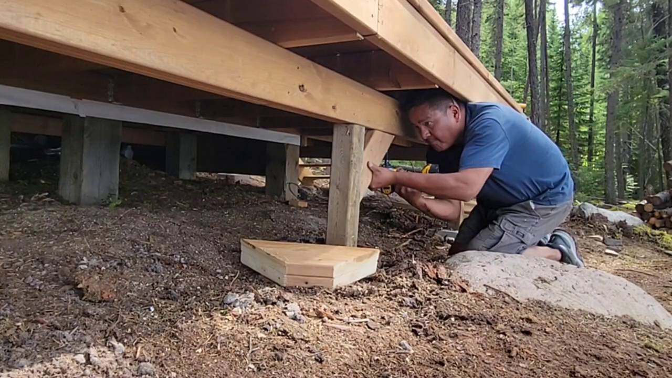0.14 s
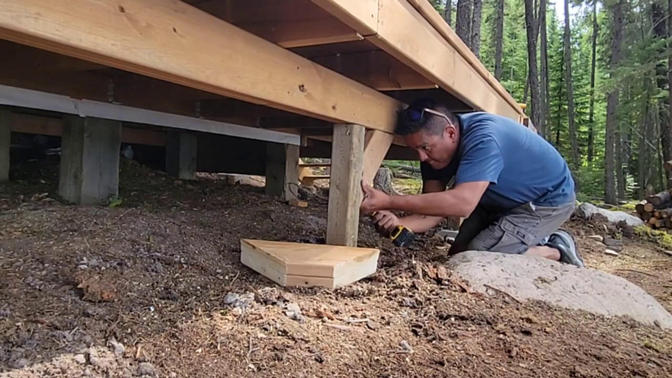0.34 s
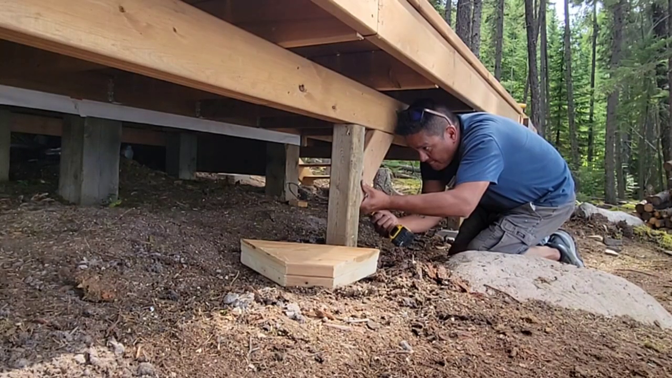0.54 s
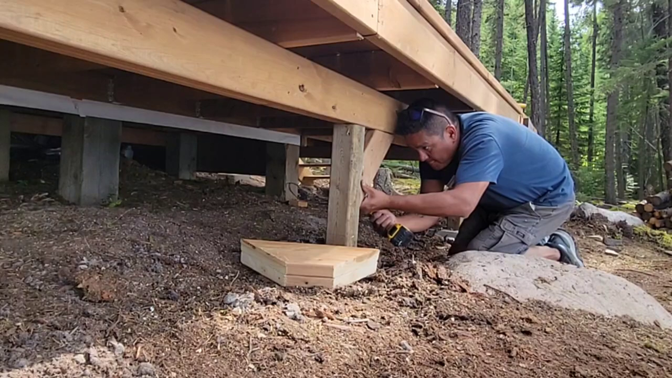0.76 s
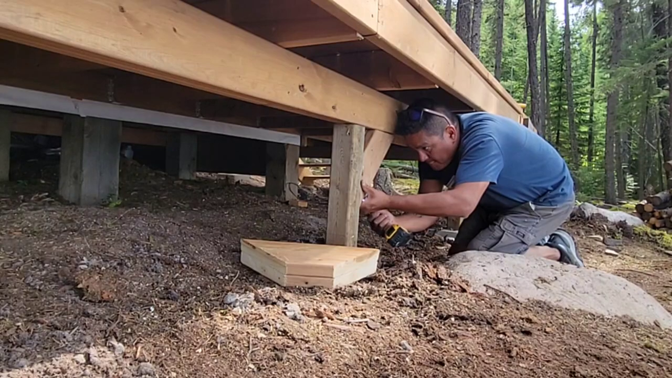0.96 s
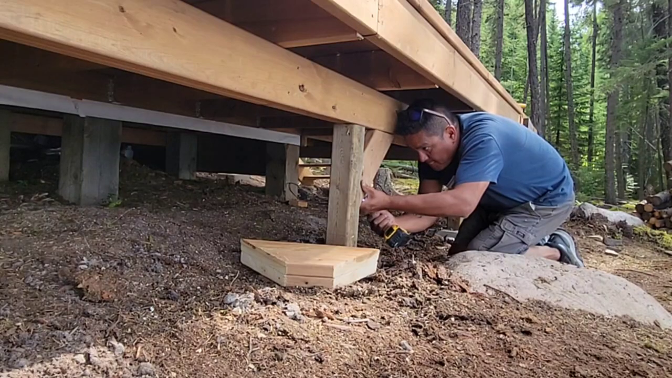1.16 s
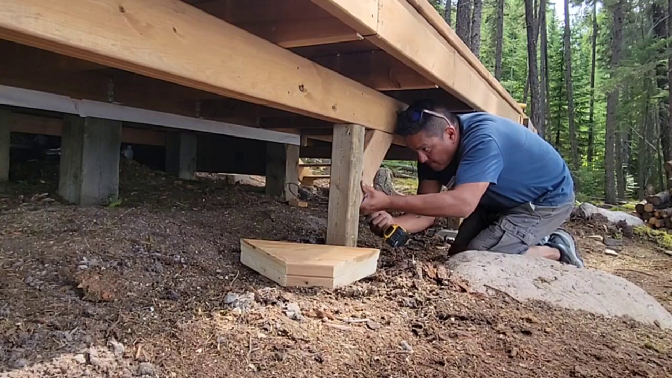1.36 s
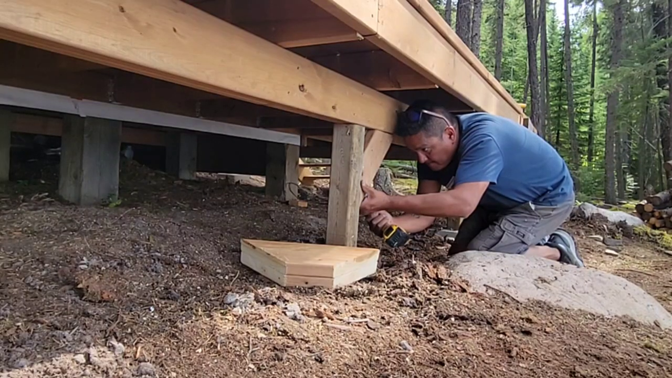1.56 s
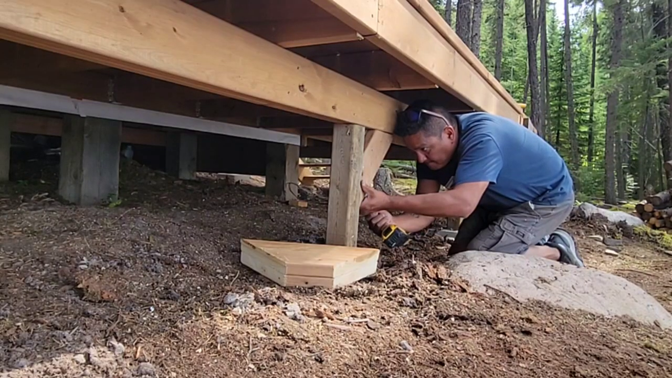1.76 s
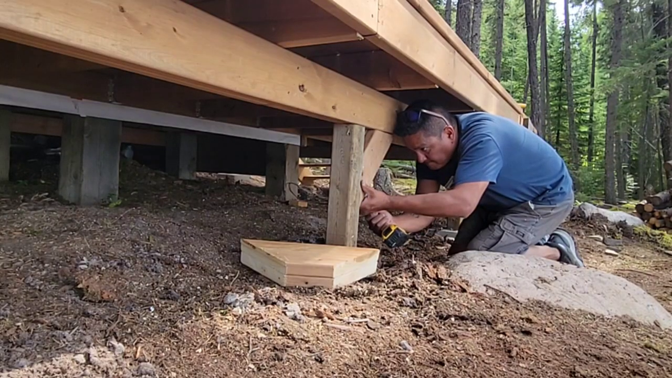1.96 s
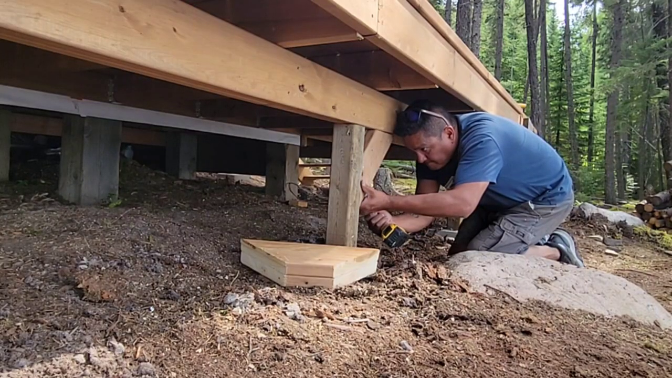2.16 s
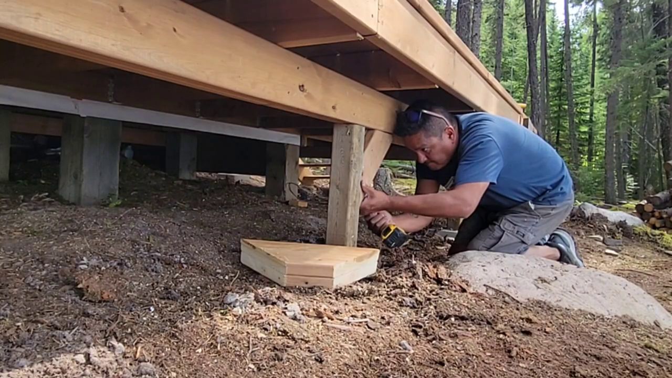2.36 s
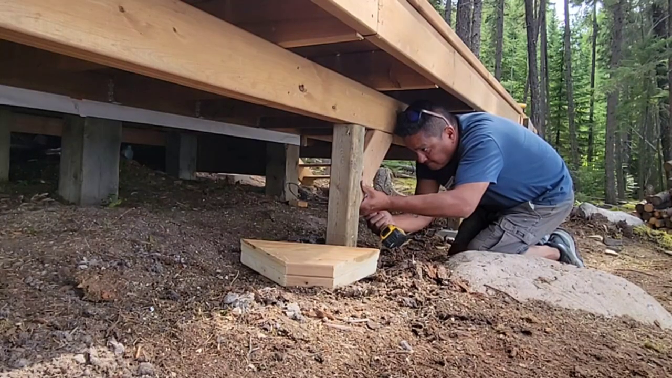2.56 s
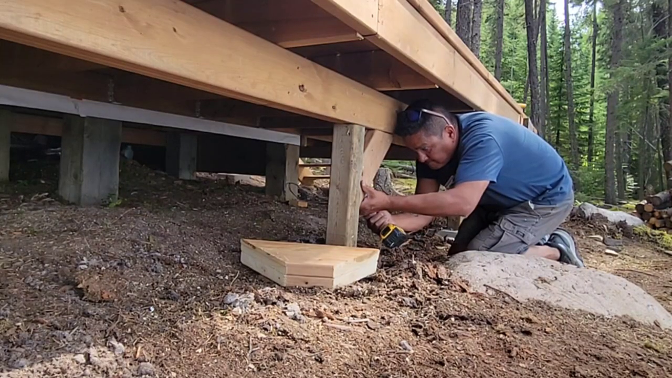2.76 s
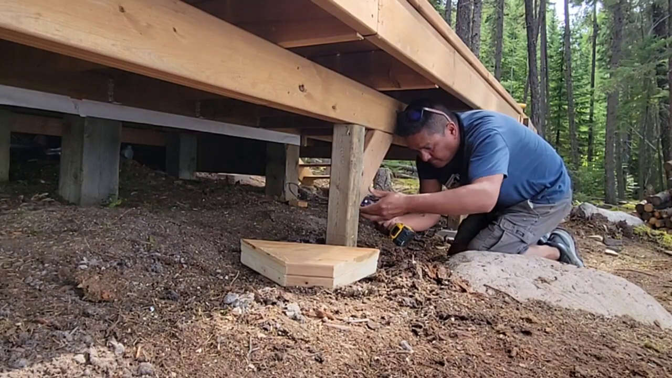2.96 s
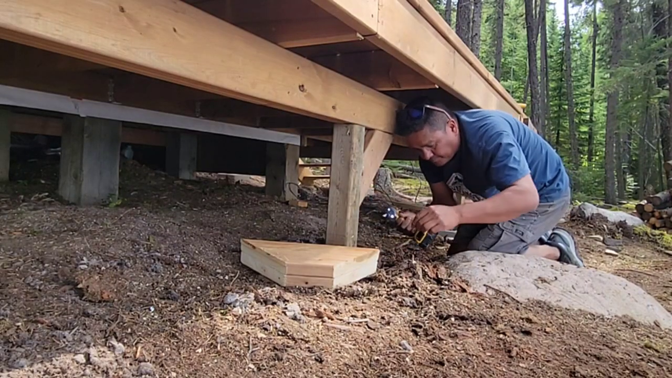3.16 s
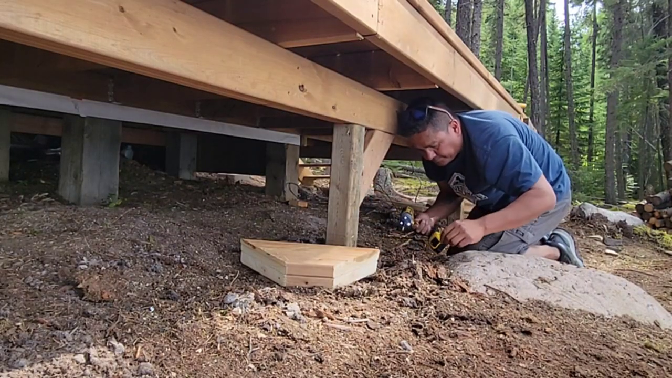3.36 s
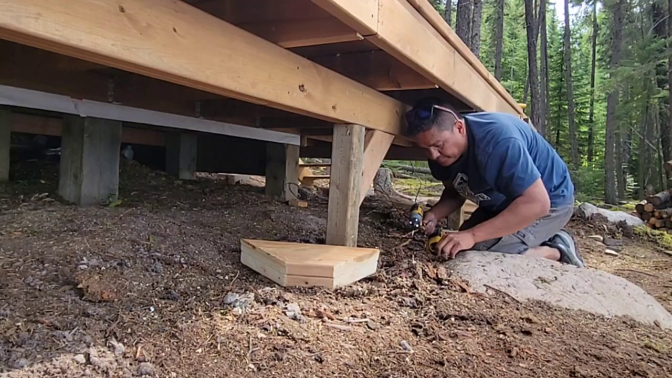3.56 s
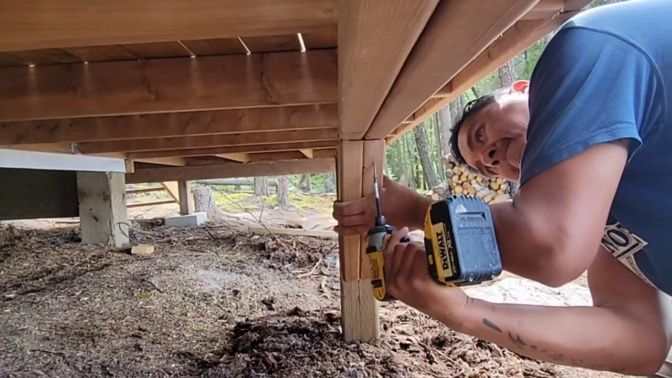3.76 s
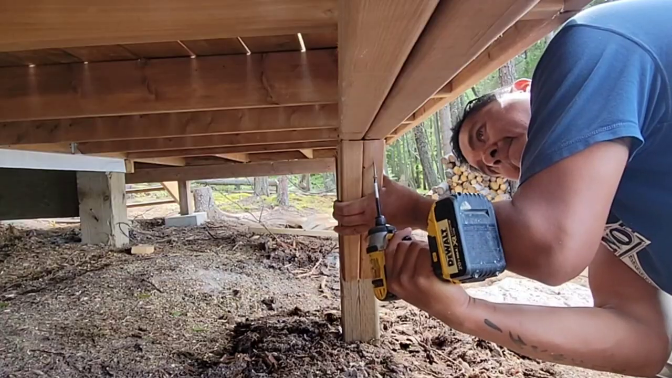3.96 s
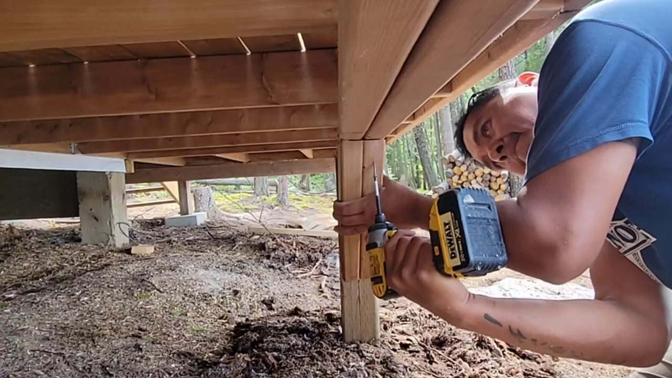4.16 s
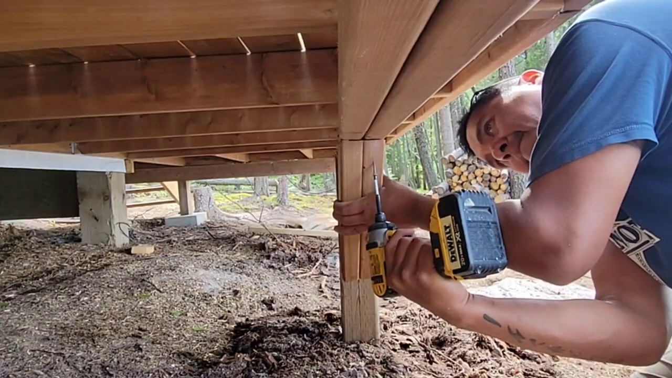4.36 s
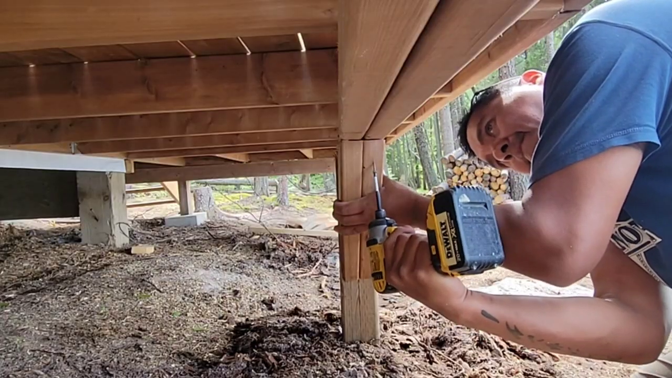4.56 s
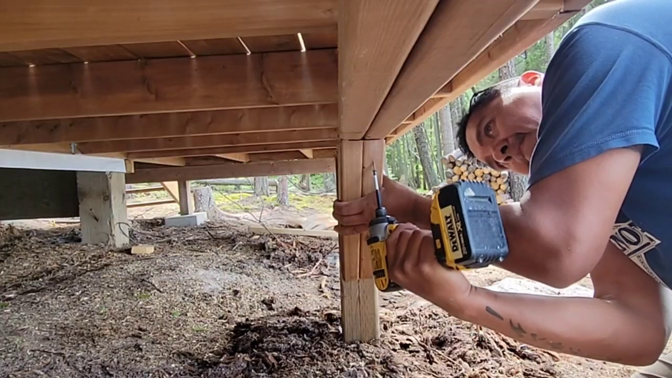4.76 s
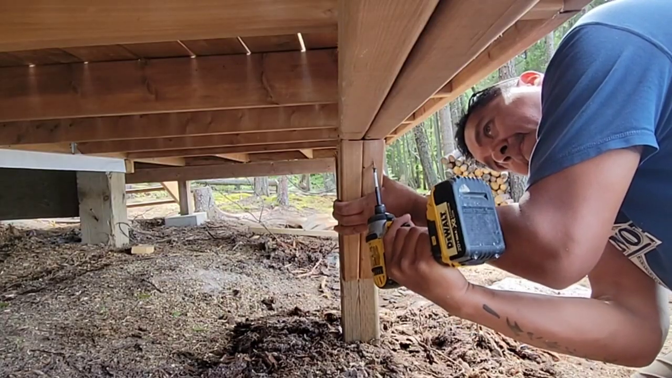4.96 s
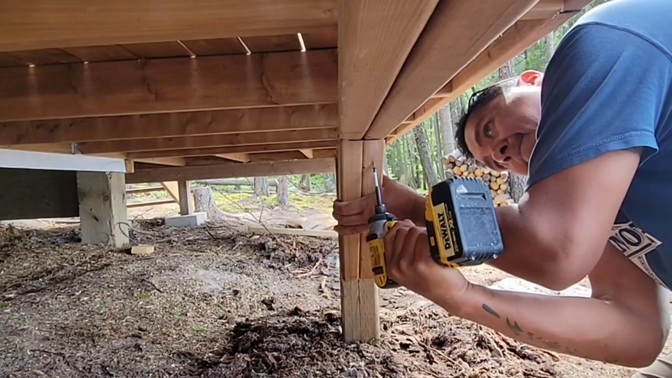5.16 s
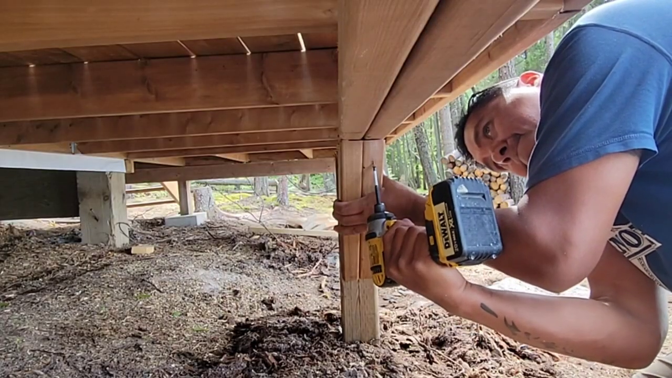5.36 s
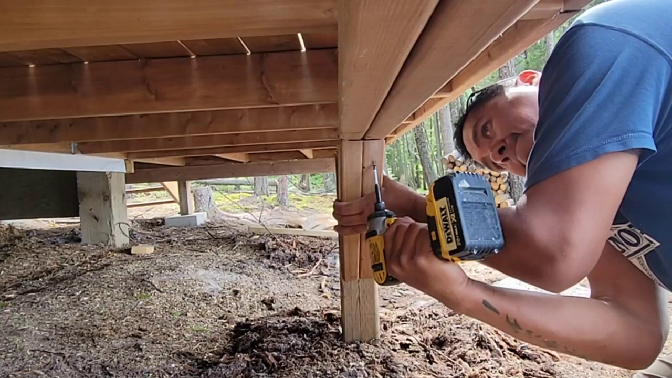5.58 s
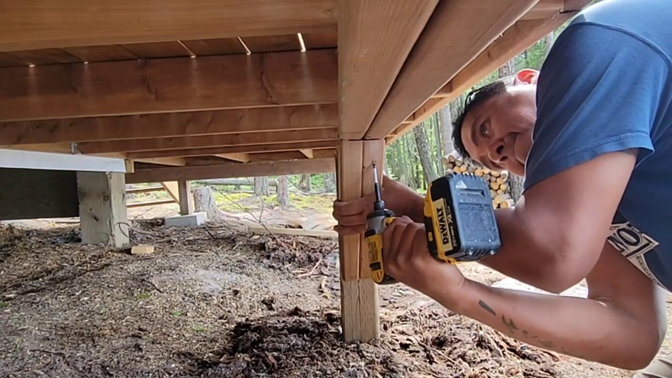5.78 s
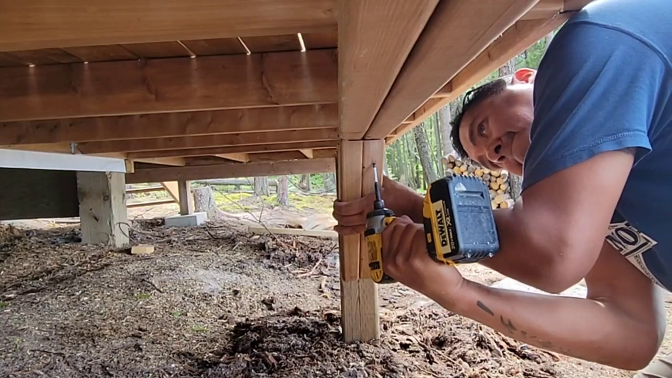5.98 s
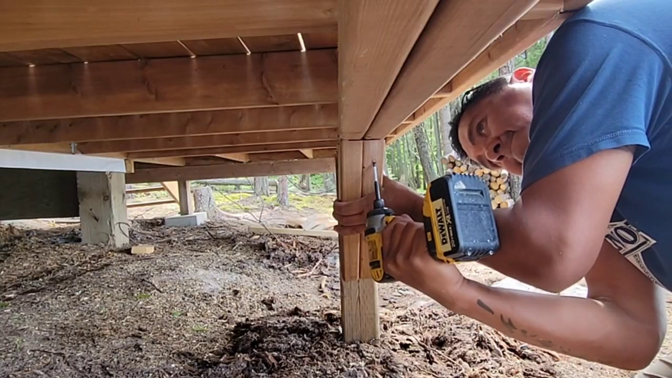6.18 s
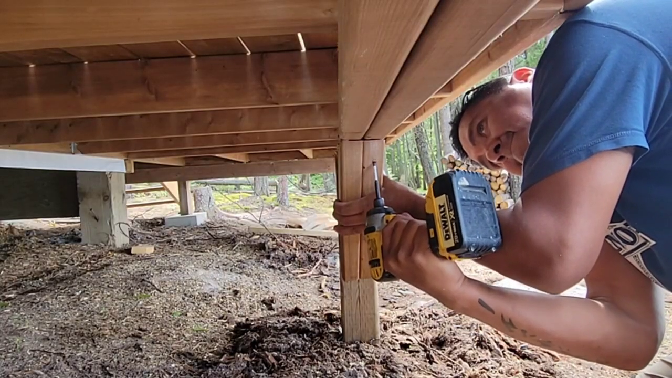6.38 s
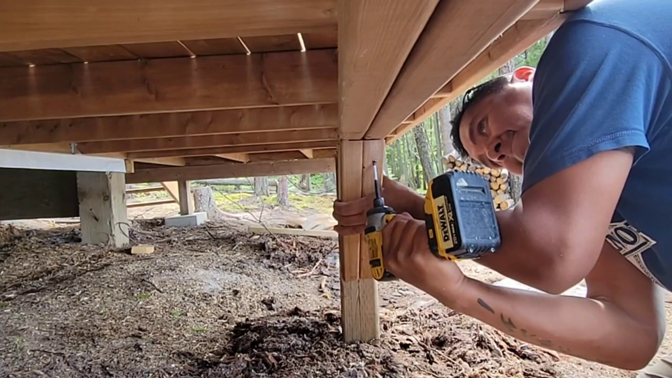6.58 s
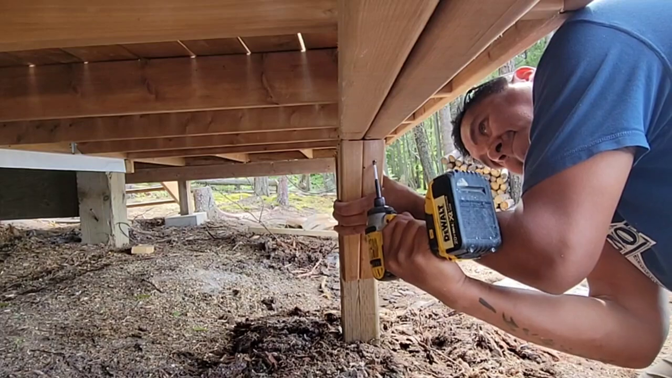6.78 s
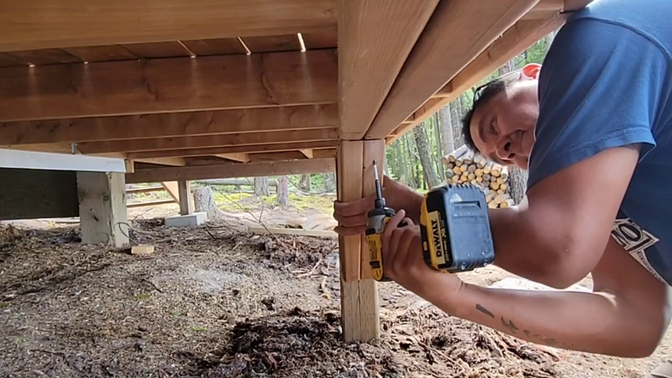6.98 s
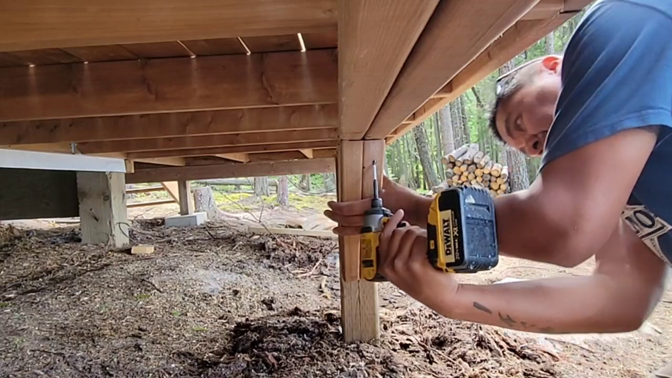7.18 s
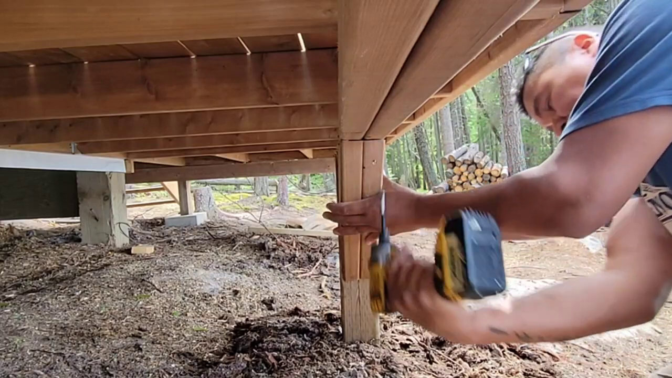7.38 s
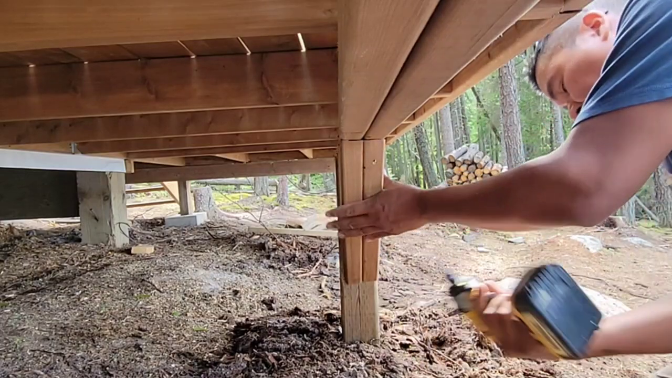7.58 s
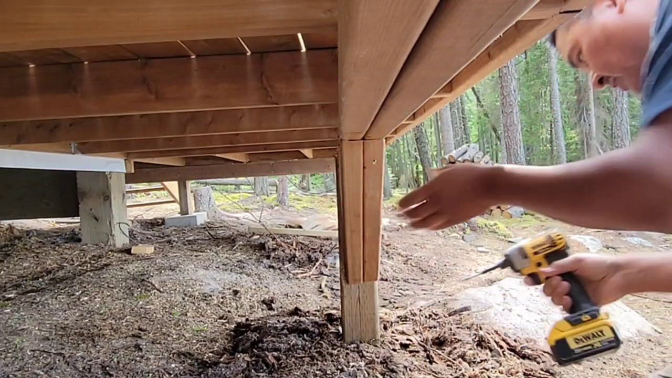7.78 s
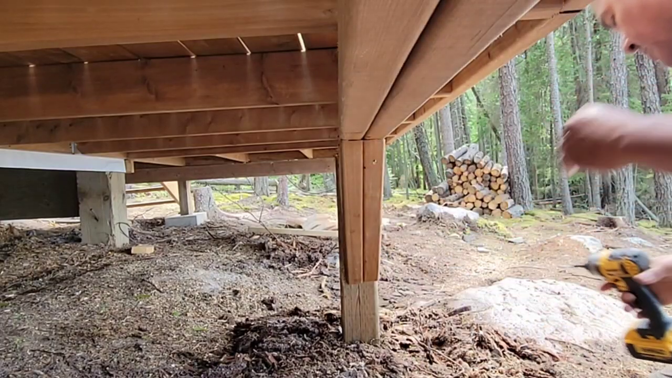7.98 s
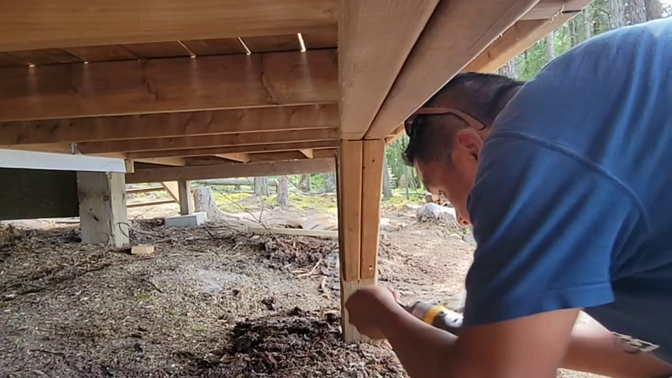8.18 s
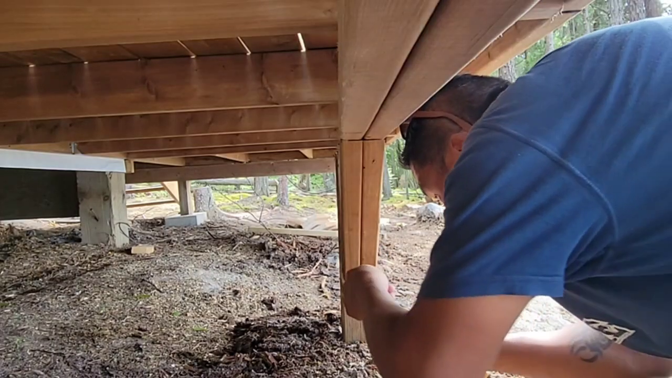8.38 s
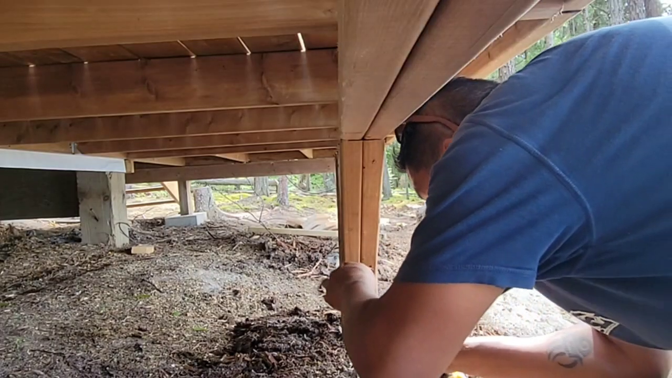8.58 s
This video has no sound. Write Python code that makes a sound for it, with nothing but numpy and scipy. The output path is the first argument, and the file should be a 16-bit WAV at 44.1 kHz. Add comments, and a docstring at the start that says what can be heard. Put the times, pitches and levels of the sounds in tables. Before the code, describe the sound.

Close stereo pickup of an impact driver on a resonant wooden post, with a short boxy echo from the deck. Blows, rising motor whine, piercing squeal, then about a second and a half of rapid hammering and a run-down. Knocks and stuttering trigger pulls lead to a second, slightly slower hammering run with metallic clatter. It ends quietly with small knocks, low generator drone and soft air rustle.

```python
"""A stereo pocket camera near an impact driver under a timber deck: a far generator fires through air and
rustle. A few opening blows ring with a timber of their own; the motor whines up, a thread squeals and the
hammer rings a braced post. At the second brace come knocks, bumps, scraping and short pulls, then the second
screw is hammered in. The motor runs down and small knocks end it. Blows ring modes; gear mesh and firing are
sine sums; rustle, scrape and clatter are filtered noise."""
import sys
import numpy as np
from scipy import signal
from scipy.fft import rfft, irfft, next_fast_len
from scipy.io import wavfile
from scipy.ndimage import uniform_filter1d

SR = 44100
rng = np.random.default_rng(int(sys.argv[2]) if len(sys.argv) > 2 else 0)


def convert_level_to_amplitude(level_db):
    """Map a level in decibels to its linear amplitude factor."""
    exponent = np.asarray(level_db, float) / 20
    return 10 ** exponent


def generate_wav(signal):
    """Clip the signal to [-1, 1] and save it as 16-bit WAV at the path in sys.argv[1]."""
    frames = np.transpose(np.atleast_2d(signal))
    scaled = np.clip(frames, -1, 1) * 32767
    pcm = np.round(scaled).astype(np.int16)
    wavfile.write(sys.argv[1], SR, pcm)


N = 380583
T = np.arange(N) / SR
# opening blows' timber ends; first brace drawn tight over this span; move to the second brace
OPENING_S, TIGHT_S, MOVED_S = 0.26, (2.12, 2.38), 3.69

# All levels are relative drives or gains, before the paths that follow.
# hammering, one table a screw: time_s, blows_per_s
STRIKE_RATE = [
    [(1.255, 41.23), (1.451, 38.33), (1.646, 39.45), (1.842, 38.98), (2.037, 38.58), (2.233, 40.65),
     (2.429, 41.3), (2.624, 41.37), (2.82, 40.42)],
    [(5.15, 28.11), (5.342, 35.05), (5.534, 33.92), (5.727, 34.66), (5.919, 36.05), (6.111, 36.17),
     (6.303, 36.68), (6.496, 37.06), (6.688, 37.02), (6.88, 38.25)],
]
# hammer cycle already done at the start of each table: share_of_cycle
STRIKE_START = [.59, .57]
# hammering, per screw: timber_db, steel_re_timber_db, loaded_gears_db, fade_s, gear_coast_s
RUNS = [(-12.5, -17.5, -23.5, 0.018, 0.1226), (-13.5, -15.5, -33, 0.073, .05)]
# steel level change up to the fade, per screw: gain_db
STEEL_GAINS_DB = [4.5, -2]
FADE_DB, COAST_DB = -12, -39.5  # last blow and end of coast, against the run
# lugs on their ramp ahead of a blow, per screw: early_share_of_cycle, level_db, pitch_hz
TICK = [(0.242, 8.5, 5410), (0.278, -4, 5435)]
# lone hammer blows: time_s, timber_db, steel_re_timber_db
BLOWS = [(0.03, -9.5, -21.5), (0.061, -16.5, -10), (0.074, -14, -15.5), (0.094, -29.5, 0),
         (0.102, -25, -7.5), (0.134, -31, -18), (1.124, -26, -19.5), (1.138, -11, -16.5), (4.131, -21, -7),
         (4.154, -25.5, -21.5), (4.775, -16, -16.5), (4.87, -8.5, -17), (4.89, -17.5, -21.5),
         (4.919, -15.5, -15), (4.93, -23.5, -27), (5.154, -13, -24), (5.173, -16, -25)]
# timber modes of the opening blows, loose first brace, tight first brace, second brace: pitch_hz, width_hz,
# gain_db
TIMBER = [
    [(75.1, 44, -5), (125, 25, -1.5), (266.5, 52, -1.5), (420, 29, -12), (620, 260, -13), (770, 68, -10),
     (950, 78, -15.5), (1200, 69, -22.5), (1380, 240, -34)],
    [(145.5, 22, -4.5), (250, 36, -7.5), (299, 61, -14.5), (400, 17, -7.5), (473.5, 31, -15.5),
     (550, 58, -13.5), (669, 27, -16), (831, 37, -9.5), (971, 10, -1), (1135, 44, -4), (1263, 60, -15),
     (1471, 56, -9.5), (1586, 41, -7.5), (1626, 130, -11.5), (1900, 100, -38)],
    [(88.4, 50, -11), (204.8, 19, 0), (387.7, 36, -8), (537.4, 40, -12), (549.3, 13, -3.5), (708, 21, -6),
     (842, 34, -14), (865, 60, -9.5), (889.4, 53, -6), (1170, 43, -8), (1430, 34, -8), (1650, 300, -12.5),
     (1766, 200, -19)],
    [(67, 34, -13), (112, 26, -6), (147.4, 15, -16), (250, 51, -7), (303, 46, -14), (339.8, 14, -11),
     (417.6, 37, -10.5), (460.3, 45, -15.5), (524, 51.6, -14), (569, 30, -15.5), (730, 77, -21.5),
     (982, 205, -23), (1072, 121, -18), (1460, 61, -24.5), (2025, 41, -33.5)],
]
# clatter of housing and bit, per screw: freq_hz, gain_db
CLATTER = [
    [(880, -29), (1500, -7.5), (2250, -17), (3350, -9.5), (4420, -19), (5540, -15.5), (6180, -16),
     (7320, -14), (9370, -17.5), (13300, -13.5), (16000, -25.5)],
    [(880, -31.5), (1500, -5.5), (1610, -9.5), (3350, 0), (4040, -10), (5540, -6.5), (6760, -9),
     (7390, -4.5), (8920, -12.5), (13100, -8.5), (16000, -16)],
]
# ring of anvil and bit: pitch_hz, width_hz, gain_db
STEEL = [(3280, 83, -10), (5430, 44, -8.5), (7120, 320, -5.5), (12600, 170, -5)]

# motor imbalance heard through the screw, per screw: level_re_timber_db
SHAFT_DB = [-21.5, 0.5]
TURNS_PER_BLOW = 7

# free running, one table a pull or run-down: time_s, gear_mesh_hz
SPEED = [
    [(.27, 429.3), (.37, 660), (.445, 930), (.51, 1016), (.626, 1070), (.722, 1350), (.822, 1408),
     (.92, 1328), (.97, 1188), (1.07, 550)],
    [(1.09, 667.5), (1.138, 951), (1.18, 1113), (1.29, 1180)],
    [(2.79, 1092), (2.96, 447.4)],
    [(4.06, 426.2), (4.134, 865.5), (4.19, 770), (4.28, 429.6)],
    [(4.39, 420), (4.44, 676.4), (4.485, 938), (4.54, 1073), (4.585, 1075), (4.67, 440.4)],
    [(4.75, 431), (4.785, 647.7), (4.82, 843), (4.877, 936), (4.91, 886), (4.98, 382.3)],
    [(5.115, 451), (5.15, 701), (5.19, 852)],
    [(6.83, 896), (6.94, 400)],
]
# per pull, levels for a 1 kHz mesh: swell_s, gear_noise_db, mesh_db, second_harmonic_db
PULLS = [(0.1, -43.5, -33.5, -40), (0.03, -38, -32.5, -39), (0.01, -38.5, -37, -56.5),
         (0.066, -31.5, -32, -25.5), (0.019, -31.5, -31.5, -28), (0.019, -31, -43, -23),
         (0.016, -30, -26.5, -40), (0.01, -48, -43, -47)]
# louder with speed; each pull swells from and brakes to the edge
DB_PER_OCTAVE, EDGE_DB, BRAKE_S = 5.5, -23.5, 0.049
HOUSING_HZ, HOUSING_WIDTH_HZ, HOUSING_DB = 1090, 105, 4
BRAKING_DB = -3
# gear noise spectrum: freq_hz, gain_db
GEARS = [(47, -31.5), (80, -0.5), (163, -19), (242, -3), (643, -10.5), (1020, -3.5), (1280, -7),
         (2080, -8.5), (2330, -8.5), (3470, -7), (4620, -10.5), (13400, -25), (16000, -30)]
# speed control pipes, trigger barely pulled: start_s, release_s
TRIGGER = [(4.063, 4.109), (4.392, 4.415), (4.759, 4.773)]
TRIGGER_HZ, TRIGGER_DB = 3920, -51.5

# thread slipping in the wood: time_s, pitch_hz, level_db
SQUEAL = [(0.565, 4460, -47.5), (0.601, 3940, -28), (0.625, 3910, -21), (0.651, 3740, -23.5),
          (0.705, 3920, -20.5), (0.791, 3770, -20), (0.859, 3196, -26), (0.933, 3507, -16.5),
          (0.981, 3190, -24.5), (0.991, 3140, -23), (1.001, 2270, -26.5), (1.04, 1260, -41)]
# squeal harmonics from the fundamental up: level_db
SQUEAL_HARMONICS_DB = [-1.5, -21, -30, -36]

# soft bumps of hand, tool and knee on the post: time_s, level_db, favoured_hz, falloff_db_per_octave
BUMPS = [(.002, -16, 260, 27.5), (0.158, -19, 243, 30), (3.706, -17, 241, 11), (3.775, -31, 322, 24),
         (3.918, -38, 359, 19), (4.115, -7, 250, 2.5), (4.701, -11.5, 250, 25), (7.296, -35.5, 250, 15.5),
         (7.609, -48, 325, 25), (7.681, -45, 230, 25)]
# low modes of the post: pitch_hz, t60_s
POST = [(100, 0.12), (150, 0.05), (258, 0.089), (370, .05), (470, 0.053)]
# small knocks of tool, screws and knees: time_s, peak_db, centre_hz
KNOCKS = [(0.2045, -42, 2940), (0.2718, -44, 980), (3.704, -24, 1010), (3.7778, -35, 2750),
          (3.9164, -55.5, 890), (3.9355, -44, 1090), (4.2956, -28.5, 1450), (4.4154, -17, 2700),
          (4.6836, -25.5, 1040), (4.703, -29.5, 1090), (5.053, -32, 1020), (5.115, -27, 3300),
          (5.1272, -13, 3230), (7.2976, -34, 1430), (7.3324, -43.5, 1150), (7.3687, -40.5, 1130),
          (7.3844, -50, 2670), (7.4872, -55, 1430), (8.0287, -43.5, 970), (8.091, -47.5, 2120),
          (8.1926, -54, 1060)]
KNOCK_T60_S, T60_FACTOR_PER_OCTAVE = .06, .7  # burst at 1 kHz; higher knocks die sooner
# bit and hands scraping on the wood: start_s, end_s, level_db
SCRAPE = [(3.69, 3.83, -53), (4.25, 4.333, -48.5), (4.648, 4.744, -47.5), (4.974, 5.09, -45),
          (7.276, 7.417, -61), (8.02, 8.26, -68)]
SCRAPE_EDGE_S, SCRAPE_EDGE_DB = 0.0332, -14.5

# background, steady from each time on: start_s, generator_db, air_db
GROUND = [(0, -47, -51.5), (3.69, -41, -52.5), (6.901, -47, -65.5), (7.25, -49.5, -59), (8.03, -46, -58)]
# generator harmonics before and after 3.69 s: harmonic_number, level_db
EXHAUST = [
    [(1, -11), (2, -12.5), (3, -16), (4, 1), (5, -3), (6, 1), (7, -4), (8, -20), (9, -17)],
    [(1, -10.5), (2, -2), (3, -0.5), (4, -0.5), (5, -10), (6, -12.5), (7, -6.5), (8, -15.5), (9, -17.5)],
]
FIRING_HZ = 31.33
# generator casing resonances: pitch_hz, width_hz, gain_db
CASING = [(500, 40, -3), (945, 40, 0), (1450, 50, -7), (2150, 60, -6), (2900, 80, -10)]
# air and rustle spectrum: freq_hz, gain_db
AIR = [(25, -10.5), (60, -6.5), (200, -13.5), (330, -24.5), (450, -30), (700, -38.5), (1500, -39.5),
       (3400, -39), (5000, -48), (8000, -48), (11000, -56.5), (16000, -59.5)]

DECK_T60_S, DECK_DB = .11, -5.5
# filter of the stereo difference: freq_hz, gain_db
WIDTH = [(60, -12.5), (110, -17.5), (200, -12.5), (380, -13.5), (700, -9), (1290, -7.5), (2380, -5),
         (4400, -1.5), (8120, -2), (15000, 0)]
TOP_HZ = 15900


def rms1(x):
    """Scale to unit rms."""
    return x / np.sqrt(np.mean(x ** 2) + 1e-30)


def noise():
    """White noise."""
    return rng.standard_normal(N)


def colour(x, points):
    """Causal minimum-phase filter with the given (Hz, dB) response."""
    hz, db = np.transpose(points)
    f = np.fft.rfftfreq(4096, 1 / SR)
    cepstrum = irfft(np.log(convert_level_to_amplitude(np.interp(np.log(f + 1), np.log(hz), db))))
    cepstrum[1:2048] *= 2
    cepstrum[2049:] = 0
    return signal.oaconvolve(x, irfft(np.exp(rfft(cepstrum))))[:N]


def ring(x, modes):
    """Damped modes of alternating sign; each dB is the gain at the centre."""
    out = 0
    for k, (hz, width_hz, db) in enumerate(modes):
        r = np.exp(-np.pi * abs(width_hz) / SR)
        zeros = [(1 - r * r) / 2, 0, (r * r - 1) / 2]
        poles = [1, -2 * r * np.cos(2 * np.pi * hz / SR), r * r]
        out = out + (-1) ** k * convert_level_to_amplitude(db) * signal.lfilter(zeros, poles, x)
    return out


def decay(x, t60_s):
    """Every pulse becomes an exponential tail."""
    return signal.lfilter([1], [1, -np.exp(-np.log(1000) / (t60_s * SR))], x)


def pulses(times_s, gains):
    """Clicks of the given gains at the given times."""
    x = np.zeros(N)
    np.add.at(x, np.clip(np.asarray(times_s) * SR, 0, N - 1).astype(int), gains)
    return x


def walk(rate_hz):
    """Random levels held 1 / rate_hz s and slewed twice; spread near 1."""
    k = int(SR / rate_hz)
    steps = np.repeat(rng.standard_normal(N // k + 1), k)
    return 1.4 * uniform_filter1d(uniform_filter1d(steps, k), k)[:N]


def curve(tables, column, off):
    """One column of several tables in time; `off` outside them."""
    out = np.full(N, float(off))
    for rows in tables:
        rows = np.array(rows)
        on = (T >= rows[0, 0]) & (T <= rows[-1, 0])
        out[on] = np.interp(T[on], rows[:, 0], rows[:, column])
    return out


def held(start, end, db, rise, fall, edge_db):
    """Rows (s, dB) of a level that rises from an edge, holds, and falls to the edge."""
    return [(start, db + edge_db), (start + rise, db),
            (max(end - fall, start + rise), db), (end, db + edge_db)]


def hammering():
    """Level curves in dB of timber, steel and loaded gears over both runs of blows."""
    timber, steel, gears = [], [], []
    for rate, run, gain_db in zip(STRIKE_RATE, RUNS, STEEL_GAINS_DB):
        db, steel_db, gears_db, fade_s, coast_s = run
        start, end = rate[0][0], rate[-1][0]
        steel_db = db + steel_db
        timber.append([(start, db), (end - fade_s, db), (end, db + FADE_DB)])
        steel.append([(start, steel_db), (end - fade_s, steel_db + gain_db), (end, steel_db - 4)])
        gears.append([(start, gears_db), (end - fade_s, gears_db),
                      (end + 0.62 * coast_s, gears_db - 7), (end + coast_s, gears_db + COAST_DB)])
    return [curve(v, column=1, off=-120) for v in (timber, steel, gears)]


def strikes():
    """Blow times, timber gains, steel gains, and lug tick times per run; hammer cycles plus lone blows."""
    lone_s, lone_timber_db, lone_steel_db = np.transpose(BLOWS)
    times, ticks = [], []
    for rows, start, tick in zip(STRIKE_RATE, STRIKE_START, TICK):
        on = T[(T >= rows[0][0]) & (T <= rows[-1][0])]
        cycles = start + np.cumsum(np.interp(on, *np.transpose(rows))) / SR
        whole = np.arange(1, int(cycles[-1]) + 1)
        times.append(np.interp(whole, cycles, on))
        ticks.append(np.interp(whole[1:] - tick[0], cycles, on))
    times = np.concatenate(times)
    chance = rng.standard_normal((3, len(times)))
    at = (times * SR).astype(int)
    run_db, run_steel_db, _ = hammering()
    all_s = np.r_[times + .0003 * chance[0], lone_s]
    timber = convert_level_to_amplitude(np.r_[run_db[at] + 1.1 * chance[1], lone_timber_db])
    steel = convert_level_to_amplitude(np.r_[run_steel_db[at] + 1.8 * chance[2], lone_timber_db + lone_steel_db])
    return all_s, timber, steel, ticks


def hammer():
    """Blows excite timber and steel modes; loose parts clatter, gears grind and lugs tick in filtered noise."""
    times, timber, steel, ticks = strikes()
    tight = np.interp(T, TIGHT_S, [0, 1])
    first = T < MOVED_S
    shares = (T < OPENING_S, first * (T > OPENING_S) * (1 - tight), first * tight, ~first)
    push = pulses(times, timber)
    # no two blows seat alike: a burst of noise drives the same modes, the upper ones more
    shake = convert_level_to_amplitude(-31) * colour(decay(push, 0.13) * noise(), [(100, -10.5), (600, -1.5), (1500, 4.5)])
    # the bit springs back and lands again, softer
    push = push + .55 * np.roll(push, int(.0064 * SR)) + .3 * np.roll(push, int(.0128 * SR))
    wood = 0
    drives_db, shakes_db = (46, 49.63, 49.05, 53.38), (9, -7.5, -0.5, 4.0)
    for share, modes, drive_db, shake_db in zip(shares, TIMBER, drives_db, shakes_db):
        wood = wood + convert_level_to_amplitude(drive_db) * ring((push + convert_level_to_amplitude(shake_db) * shake) * share, modes)
    hit = pulses(times, steel)
    # the lugs bounce for a few ms before the steel settles
    bounce = signal.oaconvolve(decay(hit, 0.015), np.hanning(300) / 100)[60:N + 60]
    crack = (bounce + convert_level_to_amplitude(-52.0) * decay(bounce, 0.073)) * convert_level_to_amplitude(2.6 * walk(1200)) * noise()
    _, steel_db, gears_db = hammering()
    running = convert_level_to_amplitude(steel_db)
    gears = colour(convert_level_to_amplitude(gears_db + 2.6 * walk(150)) * noise(), [(2000, -8), (5000, -13.0), (12000, -18.5)])
    out = wood + convert_level_to_amplitude(12.5) * ring(crack, STEEL)
    for spectrum, share, db, (_, tick_db, tick_hz), at in zip(CLATTER, (first, ~first), (25, 23), TICK, ticks):
        size = running[(at * SR).astype(int)] * convert_level_to_amplitude(tick_db + 1.7 * rng.standard_normal(len(at)))
        tick = uniform_filter1d(decay(pulses(at, size), 0.028), size=60) * noise()
        out += convert_level_to_amplitude(db) * colour(share * (crack + gears) + 0.15 * tick, spectrum)
        out += convert_level_to_amplitude(12.5) * ring(tick, [(tick_hz, 700, 0)])
    return out


def shaft():
    """Motor imbalance, locked to the hammer cycle by the gearing; weaker while the motor labours."""
    rate = curve(STRIKE_RATE, column=1, off=37)
    phase = 2 * np.pi * TURNS_PER_BLOW * np.cumsum(rate) / SR
    size = uniform_filter1d(convert_level_to_amplitude(hammering()[0]), size=900)
    labour_db = 2.6 * np.minimum(rate - 37, 0)
    return size * convert_level_to_amplitude(np.where(T < MOVED_S, *SHAFT_DB) + labour_db + 0.7 * walk(30)) * np.sin(phase)


def motor():
    """Gear mesh lines that flutter with the shaft, gear noise, and the piping of the speed control."""
    speed = curve(SPEED, column=1, off=400)
    hz = speed * (1 + .017 * walk(150))
    phase = 2 * np.pi * np.cumsum(hz) / SR
    speed_db = DB_PER_OCTAVE * np.log2(speed / 1000)
    levels = []
    for c in range(1, 4):
        spells = [held(rows[0][0], rows[-1][0], pull[c], pull[0], BRAKE_S, EDGE_DB)
                  for rows, pull in zip(SPEED, PULLS)]
        levels.append(convert_level_to_amplitude(speed_db + curve(spells, column=1, off=-120)))
    hiss, first, second = levels
    # planet gears swing the level once a shaft turn
    turn = 1 + .9 * np.cos(phase / 9)
    # at low speed the mesh is lost in the grinding
    clear = np.clip((hz - 520) / 260, 0, 1) ** 2
    # the teeth lose contact as the motor slows
    loose = convert_level_to_amplitude(BRAKING_DB * uniform_filter1d(1. * (np.gradient(speed) < 0), size=900))
    first, second = first * clear * loose, second * clear * loose
    # the housing sings along where the mesh passes its resonance
    first = first * convert_level_to_amplitude(HOUSING_DB / (1 + ((speed - HOUSING_HZ) / HOUSING_WIDTH_HZ) ** 2))
    out = first * turn * convert_level_to_amplitude(4.4 * walk(70)) * np.sin(phase)
    out += second * convert_level_to_amplitude(1 * walk(70)) * np.sin(2 * phase) * 1.1
    # the upper harmonics stand out only close to the tool
    upper = second * convert_level_to_amplitude(np.where(T < MOVED_S, -16, -3))
    out += upper * (convert_level_to_amplitude(4 * walk(90)) * np.sin(3 * phase) + convert_level_to_amplitude(4 * walk(90)) * np.sin(4 * phase))
    out += convert_level_to_amplitude(7) * hiss * rms1(colour(convert_level_to_amplitude(1.6 * walk(300)) * noise(), GEARS))
    for start, end in TRIGGER:
        gate = np.interp(T, [start, start + 0.0015, end, end + .01], [0, 1, 1, 0])
        out += convert_level_to_amplitude(TRIGGER_DB) * gate * np.sin(2 * np.pi * TRIGGER_HZ * T)
    return out


def squeal():
    """Stick-slip of the thread: a rough tone whose overtones are rougher still."""
    hz = curve([SQUEAL], column=1, off=1000) * (1 + .006 * walk(60) + .011 * walk(350))
    phase = 2 * np.pi * np.cumsum(hz) / SR
    size = uniform_filter1d(convert_level_to_amplitude(curve([SQUEAL], column=2, off=-120)), size=200)
    size = size * convert_level_to_amplitude(2.0 * walk(90) + 2.3 * walk(400))
    tone = 0
    for k, db in enumerate(SQUEAL_HARMONICS_DB):
        tone = tone + convert_level_to_amplitude(db + 2 * k * walk(500)) * np.sin((k + 1) * phase + k * walk(470))
    return 2 * size * tone


def bumps():
    """Each bump swings the post's low modes near the pitch it favours, pushed for about a cycle."""
    out = np.zeros(N)
    t = T[:SR // 4]
    for s, db, near_hz, slope_db in BUMPS:
        i = int(s * SR)
        for hz, t60_s in POST:
            swing = np.minimum(t * hz, 1) * np.exp(-np.log(1000) * t / t60_s) * np.sin(2 * np.pi * hz * t)
            out[i:i + len(t)] += convert_level_to_amplitude(db - slope_db * abs(np.log2(hz / near_hz))) * swing * 1.5
    return out


def knocks():
    """Short noise bursts, each through its own broad resonance and the dry rattle of the housing."""
    out = np.zeros(N)
    n = np.arange(8192)
    for s, db, hz in KNOCKS:
        t60_s = KNOCK_T60_S * T60_FACTOR_PER_OCTAVE ** np.log2(hz / 1000)
        envelope = np.exp(-np.log(1000) * n / SR / t60_s) * np.minimum(n / 130, 1)
        burst = rng.standard_normal(len(n)) * envelope
        burst = ring(burst, [(hz, 0.42 * hz, 0), (3000, 1500, -6)]) + 0.11 * burst
        i = int(s * SR)
        out[i:i + len(n)] += (convert_level_to_amplitude(db) * burst / np.abs(burst).max())[:N - i]
    return out


def scrape():
    """Gritty friction: flickering filtered noise."""
    flicker = convert_level_to_amplitude(6 * walk(250))
    grit = colour(flicker * noise(), [(200, -11), (700, 7.0), (2500, -4.0), (5000, -9.5), (14000, -25.5)])
    spells = [held(a, b, db, SCRAPE_EDGE_S, SCRAPE_EDGE_S, SCRAPE_EDGE_DB) for a, b, db in SCRAPE]
    return convert_level_to_amplitude(curve(spells, column=1, off=-120)) * rms1(grit)


def exhaust(harmonics, phase, bend):
    """Firing harmonics; the way through the trees delays the upper ones."""
    return rms1(sum(convert_level_to_amplitude(db + 1.2 * walk(7.3)) * np.sin(k * phase - bend * k * k) for k, db in harmonics))


def background():
    """The generator's firing and casing rattle over flickering air and rustle."""
    start_s, hum_db, air_db = np.transpose(GROUND)
    now = np.searchsorted(start_s[1:], T)
    hum_db, air_db = (uniform_filter1d(v[now], size=2000) for v in (hum_db, air_db))
    phase = 2 * np.pi * np.cumsum(FIRING_HZ * (1 + .002 * walk(4))) / SR
    at_first, at_second = (exhaust(h, phase, bend) for h, bend in zip(EXHAUST, (.6, .8)))
    moved = uniform_filter1d(1. * (T > MOVED_S), size=500)
    hum = (1 - moved) * at_first + moved * at_second
    # the casing rattles once a firing
    rattle = rms1(ring((1 + .7 * np.cos(phase)) * noise(), CASING)) * convert_level_to_amplitude(np.where(T < MOVED_S, -21, -29))
    air = rms1(colour(convert_level_to_amplitude(1.3 * walk(15)) * noise(), AIR))
    return (hum + rattle) * convert_level_to_amplitude(hum_db) + air * convert_level_to_amplitude(air_db)


def heard():
    """Tool sounds echo under the deck: a short noise tail, strongest around 500 Hz, weaker in bass and treble."""
    tool = hammer() + shaft() + motor() + squeal() + knocks() + scrape() + bumps()
    n = np.arange(int(.4 * SR))
    deck = rng.standard_normal(len(n)) * np.exp(-np.log(1000) * n / SR / DECK_T60_S) * (n > .003 * SR)
    echo = colour(signal.oaconvolve(tool, deck / np.linalg.norm(deck))[:N],
                  [(150, -14.0), (500, 7.5), (1500, -5.5), (4000, -5), (10000, -15.5)])
    return tool + convert_level_to_amplitude(DECK_DB) * echo + background()


def scene():
    """The two microphones hear the bass alike, a little out of step; in the treble their paths differ."""
    mid = heard()
    apart = colour(mid, [(1000, 0), (3000, -6), (8000, -9)])
    apart = apart + colour(heard(), [(300, -9), (1500, -5), (3000, 0)])
    # a quarter cycle out of step
    side = colour(signal.hilbert(apart, next_fast_len(N))[:N].imag, WIDTH)
    return np.array([mid + side, convert_level_to_amplitude(1.1) * (mid - side)])


def top_cut(x):
    """Nothing passes above the cut-off."""
    return signal.sosfilt(signal.butter(12, 16990, fs=SR, output="sos"), x)


def record(dry):
    """The camera rounds the loudest peaks and cuts the top."""
    rounded = np.tanh(1.15 * dry) / 1.15
    mix = signal.sosfilt(signal.ellip(8, .2, 70, TOP_HZ, fs=SR, output="sos"), rounded)
    return top_cut(mix)


dry = scene()
out = record(dry)
generate_wav(out)
```